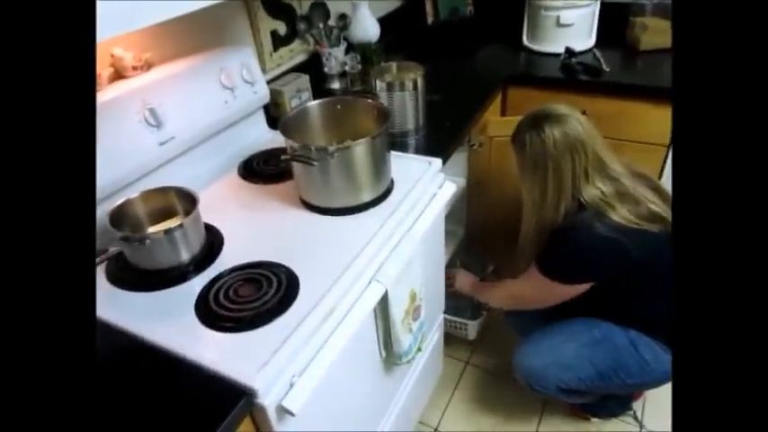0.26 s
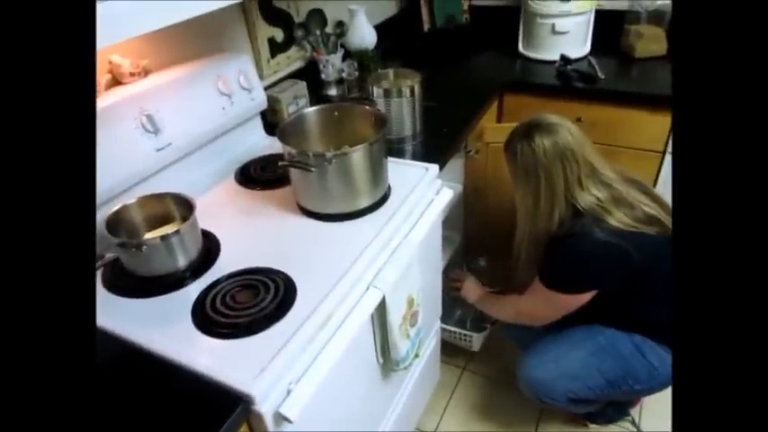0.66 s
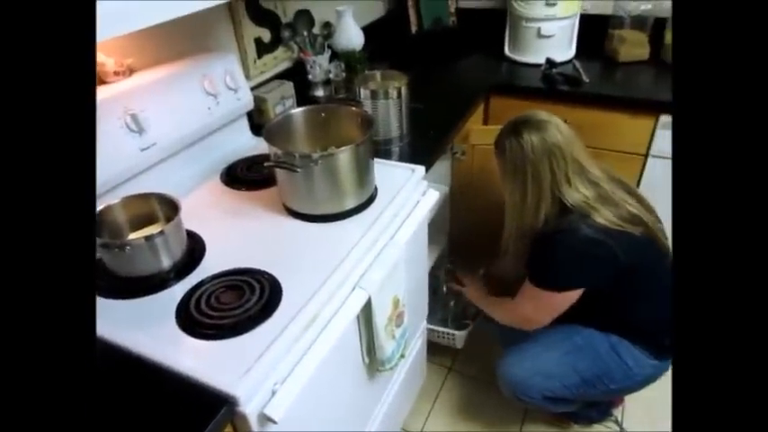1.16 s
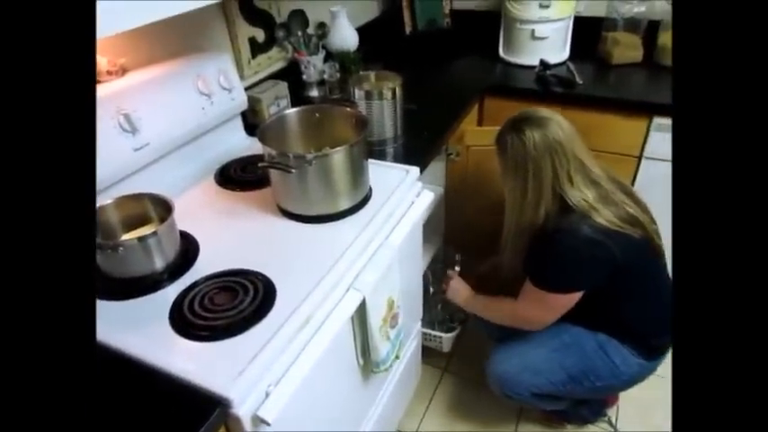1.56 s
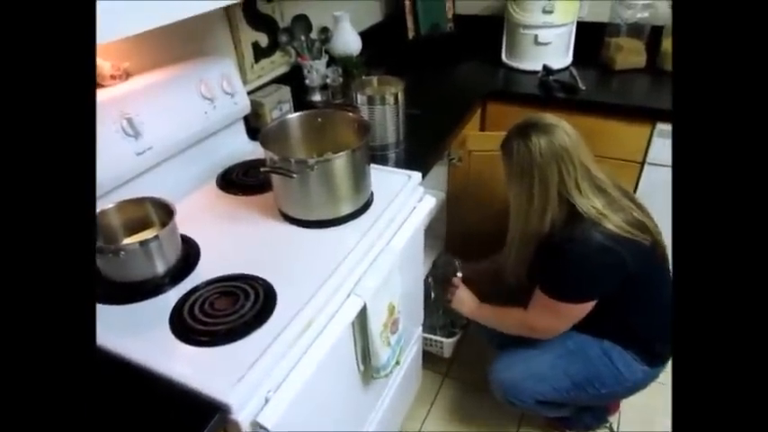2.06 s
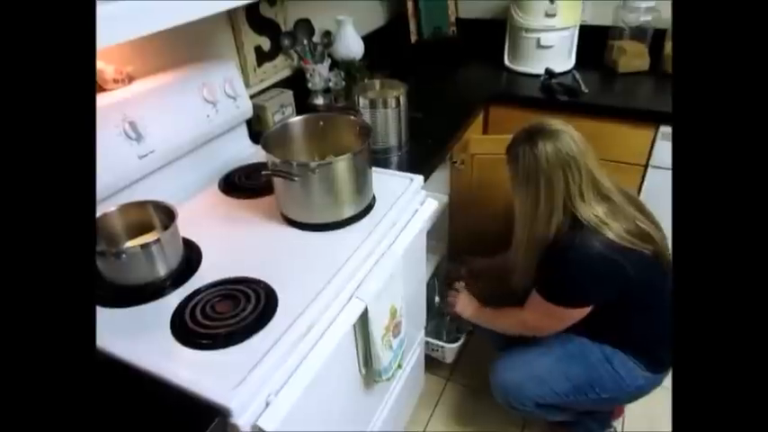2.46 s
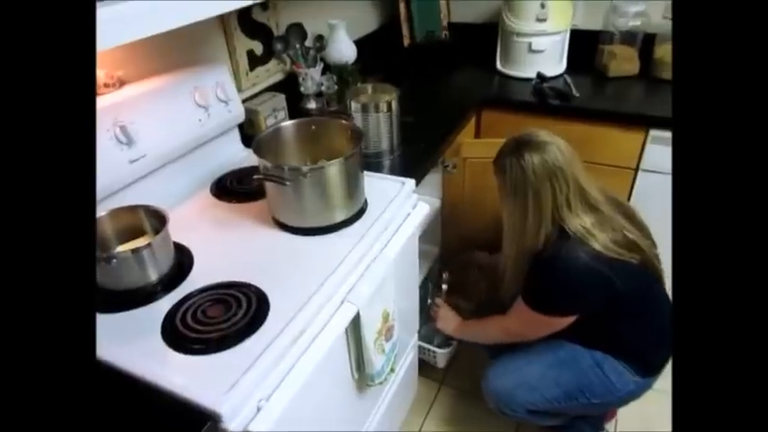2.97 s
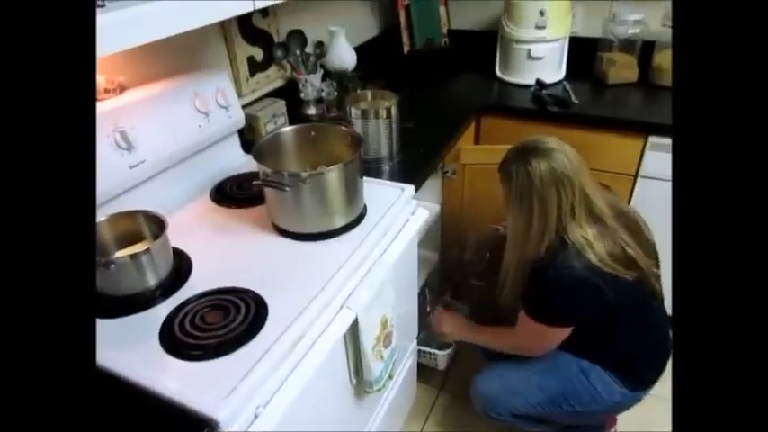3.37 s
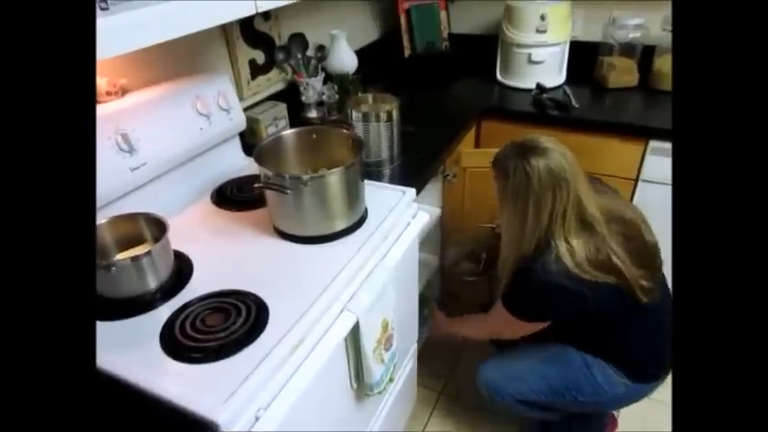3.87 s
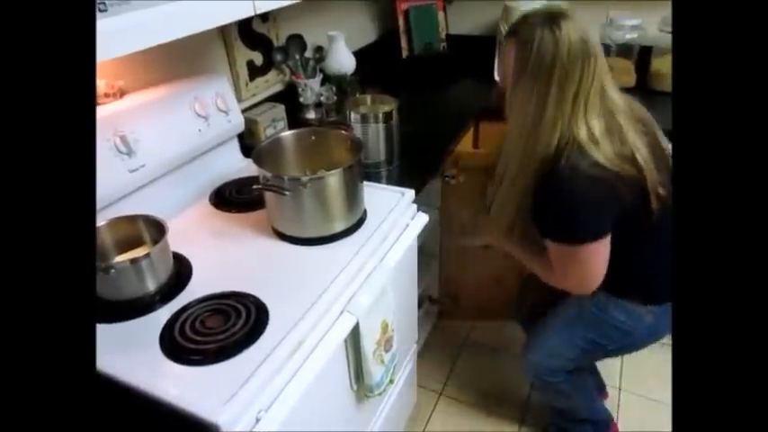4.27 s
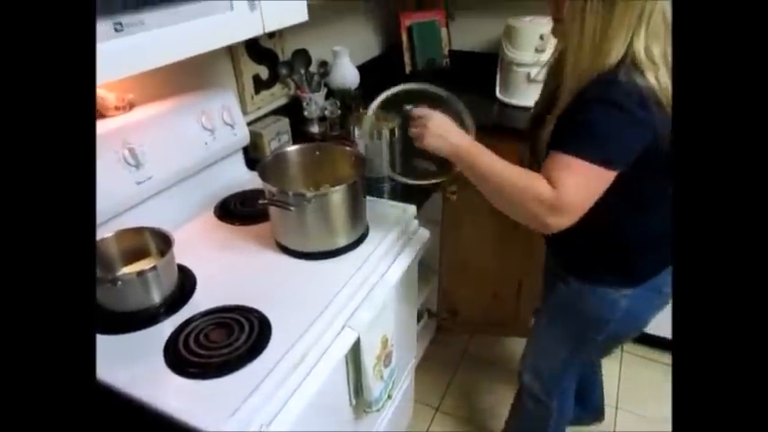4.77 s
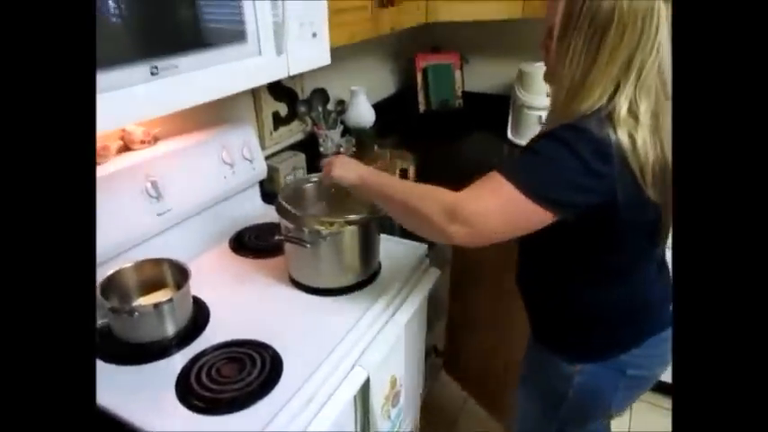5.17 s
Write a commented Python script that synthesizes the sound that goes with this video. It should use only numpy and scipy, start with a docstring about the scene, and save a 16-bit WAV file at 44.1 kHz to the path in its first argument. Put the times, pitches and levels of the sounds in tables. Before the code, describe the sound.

Metal pot lids clatter, clack and scrape in bursts as someone rummages through a kitchen cabinet, ending with a short soft rattle.

```python
"""Pot lids are shifted about in a wire basket inside a wooden kitchen cabinet, over a faint hiss.
Two rummages up to 2.2 s, two more from 2.3 to 4.3 s, then a short soft one at 4.85 s.
In each, rims clack and lids knock the shelf: noise bursts plus dying sine modes.
Lids scrape (random catches through the modes) and rocking lids hum (single wavering modes).
The tiled kitchen rings on after every blow: decaying sparse taps."""
import sys
import numpy as np
from scipy import signal
from scipy.fft import rfft, irfft
from scipy.io import wavfile
from scipy.ndimage import uniform_filter1d

SR = 44100
rng = np.random.default_rng(int(sys.argv[2]) if len(sys.argv) > 2 else 0)


def file_out(sig):
    """Save sig as 16-bit WAV at sys.argv[1]."""
    # one column per channel
    cols = np.atleast_2d(sig).T
    # limit, then scale
    lim = np.clip(cols, -1, 1)
    pcm = np.round(lim * 32767).astype(np.int16)
    wavfile.write(sys.argv[1], SR, pcm)


N = 238786

# mode pitches of shelf, basket and lid bowls: f/Hz
STACK_MODE_HZ = [102, 167, 228, 276, 323, 382, 450, 489, 582, 640, 700, 742, 797, 906, 970, 1040, 1190,
                 1330]
# strength of those modes, same order: level/dB, t60/s (t60 limited in rings)
STACK_MODES = [(-6.5, 0.31), (-5, 0.35), (4, 0.066), (-2, 0.22), (-3, 0.088), (-3.5, 0.17), (2.5, 0.13),
               (-2, .35), (-5.5, 0.43), (-15, 0.48), (4, 0.52), (4.5, 0.073), (1, 0.37), (5, 0.21),
               (-2, 0.37), (4, 0.11), (-12.5, 0.33), (-43, 0.15)]
# mode pitches of lid rims: f/Hz
RIM_MODE_HZ = [1450, 1572, 1768, 1992, 2170, 2385, 2520, 2750, 3050, 3230, 3420, 3680, 3950, 4300, 4700,
               5200, 5700, 6500]
# contact noise of rim on rim: f/Hz, relative density/dB per Hz
CRACK_SPECTRUM = [(410, -21), (700, -7), (1970, -7.5), (3370, -8), (4860, -11), (7490, -16), (13900, -30.5),
                  (15400, -37), (16000, -71)]
# contact noise of lid on shelf and basket: f/Hz, relative density/dB per Hz
THUMP_SPECTRUM = [(18, -60), (30, -40.5), (321, 2.5), (636, 0.5), (794, 2.5), (887, 0), (1070, -1.5),
                  (1600, -11.5), (2500, -16), (3250, -15), (5500, -120)]


def gain_of(db):
    """Amplitude factor of a level in dB."""
    return 10 ** (np.asarray(db) / 20)


def evened(x):
    """Scales each row to unit RMS."""
    return x / np.sqrt(np.mean(x ** 2, -1, keepdims=True) + 1e-20)


def read(points, hz):
    """Interpolates a (f/Hz, value) table over log frequency."""
    f, value = np.transpose(points)
    return np.interp(np.log(hz + 1), np.log(f + 1), value)


def add(mix, s, sound):
    """Adds a sound to the mix from s seconds on, cut at the end."""
    part = mix[round(s * SR):][:len(sound)]
    part += sound[:len(part)]


def coloured(x, spectrum):
    """Filters each row by a spectrum, zero phase."""
    hz = np.fft.rfftfreq(x.shape[-1], 1 / SR)
    return irfft(rfft(x) * gain_of(read(spectrum, hz)), x.shape[-1])


def hiss():
    """Faint noise of fixed mean spectrum; smoothed random patches drift its level over time and pitch."""
    # f/Hz, relative density/dB per Hz
    spectrum = [(15, -29), (25, -19.5), (50, -3.5), (92, -3.5), (123, 1.5), (145, -3), (591, -9),
                (1520, -7), (1790, -8), (2280, -10.5), (5000, -17.5), (7920, -23), (14400, -34.5),
                (16000, -58)]
    level_db, patch_rms_db = -47.5, 1.3
    frames, hz = N // 256 + 5, np.fft.rfftfreq(1024, 1 / SR)
    a, b, patches = rng.standard_normal((frames, 513, 3)).T
    patches = uniform_filter1d(uniform_filter1d(patches, 12, 0), 14, 1)
    patch_db = patch_rms_db * patches / patches.std()
    z = (a + 1j * b) * gain_of(read(spectrum, hz)[:, None] + patch_db)
    noise = signal.istft(z, nperseg=1024, noverlap=768)[1][:N]
    return gain_of(level_db) * evened(noise)


def kitchen(x):
    """Sparse taps of random sign, each band dying at its own speed; three tails take turns so blows differ."""
    # f/Hz, t60/s
    decay = [(100, 0.16), (260, 0.61), (700, 0.67), (1840, 0.72), (4850, 0.54), (12800, 0.33)]
    gap, first, turns_per_s = 20, 150, 3  # gap and first in samples
    taps = np.zeros((3, SR))
    at = np.arange(first, SR - gap, gap) + rng.integers(0, gap, (3, (SR - first - 1) // gap))
    np.put_along_axis(taps, at, rng.choice([-1., 1.], at.shape), 1)
    hz, t, z = signal.stft(taps, SR, nperseg=256)
    fade = gain_of(-60 * t / read(decay, hz)[:, None])
    tails = signal.istft(z * fade, SR, nperseg=256)[1]
    tails /= np.linalg.norm(tails[0])
    turn = 2 * np.pi * (turns_per_s * np.arange(N) / SR + np.arange(3)[:, None] / 3)
    shares = np.sqrt(2 / 3) * np.cos(turn)  # constant total power
    return signal.fftconvolve(x * shares, tails, axes=1)[:, :N].sum(0)


def rings(pitches, modes):
    """One exponentially dying sine for each mode, 1/3 s long."""
    db, t60 = np.transpose(modes)[:, :, None]
    t, t60 = np.arange(SR // 3) / SR, np.clip(t60, .03, .22)
    return gain_of(db - 60 * t / t60) * np.sin(2 * np.pi * np.c_[pitches] * t)


def rim_modes():
    """Touching rims damp fast: level falls with pitch, t60 is a fixed count of cycles (limited in rings)."""
    fall_db_per_octave, cycles_in_t60 = 4, 130
    return [(-fall_db_per_octave * np.log2(hz / RIM_MODE_HZ[0]), cycles_in_t60 / hz) for hz in RIM_MODE_HZ]


def scrape(offset_db, slope, pitches, modes, spectrum, per_s, spread_db, ring_db):
    """Tiny uneven catches, as strong as the drag, heard directly and through the modes."""
    # how hard lids drag over the stack, one list for each rummage: t/s, level/dB before offset and slope
    drag = [
        [(0.0, -48.5), (0.15, -44), (0.21, -28), (0.41, -30), (0.5, -27), (0.8, -42.5), (1.01, -23.5),
         (1.23, -42)],
        [(1.3, -40), (1.45, -29), (1.57, -26.5), (1.76, -34.5), (2.04, -45.5), (2.15, -57)],
        [(2.28, -57), (2.43, -28.5), (2.51, -17.5), (2.57, -33.5), (2.71, -27), (2.78, -38.5), (2.98, -44),
         (3.11, -26), (3.52, -47)],
        [(3.6, -41.5), (3.91, -25), (4.0, -24.5), (4.06, -43), (4.17, -39), (4.3, -71)],
        [(4.845, -46.5), (5.01, -56), (5.08, -65.5)],
    ]
    t, level = np.arange(N) / SR, np.zeros(N)
    for rows in drag:
        s, db = np.transpose(rows)
        level += gain_of(np.interp(t, s, offset_db + slope * db, -120, -120))
    chance, side, size = rng.random((3, N))
    catches = (chance < per_s / SR) * np.sign(side - .5)
    catches = catches * gain_of(-spread_db * np.log(size + 0.076))
    catches = level * evened(catches)
    ring = rings(pitches, modes).sum(0)
    ring /= np.linalg.norm(ring)
    grit = coloured(np.r_[np.zeros(1024), 1, np.zeros(1023)], spectrum)
    direct = signal.oaconvolve(catches, grit / np.linalg.norm(grit), "same")
    return direct + gain_of(ring_db) * signal.oaconvolve(catches, ring)[:N]


def rumble():
    """Drag heard through shelf, basket and bowls: sparser catches of nearly even size."""
    return scrape(0, 1, STACK_MODE_HZ, STACK_MODES, THUMP_SPECTRUM,
                  per_s=600, spread_db=-0.5, ring_db=-9.5)


def rasp():
    """Drag heard at the rims: denser, more uneven catches, almost no ring."""
    return scrape(-13, 0.83, RIM_MODE_HZ, rim_modes(), CRACK_SPECTRUM,
                  per_s=1500, spread_db=3, ring_db=-43.0)


def hums(rough, grain_ms):
    """Single modes that swell fast, waver in strength and phase while the lid rocks, and die away."""
    # t/s, level/dB, f/Hz (nearest mode sounds), t60/s
    table = [(.005, -37.5, 228, 0.099), (.125, -28, 906, 0.066), (0.216, -16.5, 323, 0.5),
             (0.214, -32, 102, 0.32), (.455, -21.5, 489, 0.71), (.68, -37, 228, 0.5),
             (0.848, -30.5, 102, 0.27), (0.942, -38, 1768, 0.97), (0.961, -24.5, 489, 0.64),
             (1.075, -14.5, 276, 0.13), (1.205, -42, 1992, 0.99), (1.43, -19, 489, 0.29),
             (1.674, -24.5, 102, 0.19), (1.675, -34.5, 700, 0.98), (1.76, -40.5, 167, 1),
             (2.41, -19, 582, 0.22), (2.53, -35, 1768, 1), (2.6, -40, 700, 0.27), (3.671, -20.5, 906, 0.15),
             (3.97, -23.5, 797, 0.38), (4.061, -32, 1040, 0.28)]
    swell_s, held_share = 0.0084, 0.11  # level holds for this share of t60 before it falls
    out, t, pitches = np.zeros(N), np.arange(SR) / SR, np.r_[STACK_MODE_HZ, RIM_MODE_HZ]
    size = round(grain_ms * SR / 1000)
    shakes = rng.standard_normal((len(table), 2, SR))
    shakes = evened(uniform_filter1d(uniform_filter1d(shakes, size), size))
    for (s, db, hz, t60), (a, b) in zip(table, shakes):
        mode_hz = pitches[np.argmin(abs(pitches - hz))]
        fall_db = 60 * np.maximum(t - held_share * t60, 0) / max(t60, .05)
        level = gain_of(db - fall_db) * (1 - np.exp(-t / swell_s))
        waver = 1 + rough * (a + 1j * b)
        add(out, s, level * (waver * np.exp(2j * np.pi * mode_hz * t)).imag)
    return out


def blows(table, rule, pitches, modes, spectrum, grit_db, spot_db, spot_octaves, chance_db, lift_hz, order):
    """Each blow: contact noise plus modes, strongest near the struck pitch; harder means shorter contact."""
    settle_db, settle_s, settle_grain_db = -17, 0.018, 6  # a struck lid rattles as it settles
    chatter = .5  # waver of the ring while lids touch
    stiff_power = 0.39  # higher-pitched spots are stiffer: shorter contact
    out, ring, mode_hz = np.zeros(N), rings(pitches, modes), np.array(pitches)
    t, bins = np.arange(4096) / SR, np.fft.rfftfreq(4096, 1 / SR) + 1
    ring_s = np.arange(ring.shape[1]) / SR
    luck = rng.standard_normal((len(table), 2 * len(modes) + len(t) + len(t) // 128))
    hard_ms, ms_per_db, hard_ring_db, ring_per_db = rule
    for (s, db, hz, lift_db), draw in zip(table, luck):
        near = lambda f: np.exp(-(np.log2(f / hz) / spot_octaves) ** 2)
        # lifts below lift_hz, or above it for a negative order
        lift = lambda f: lift_db / (1 + (f / lift_hz) ** order)
        sign, size, grit, rattle = np.split(draw, np.cumsum([len(modes), len(modes), len(t)]))
        contact_s = max(hard_ms - ms_per_db * db, 1) / 1000
        contact_s *= (np.median(mode_hz) / hz) ** stiff_power

        grit = rfft(evened(coloured(grit, spectrum)))
        burst = irfft(grit * gain_of(grit_db * near(bins) + lift(bins)))
        uneven_db = settle_grain_db * np.repeat(rattle, len(t) // len(rattle))
        settle = gain_of(settle_db + uneven_db) * np.exp(-t / settle_s)
        fall = np.exp(-(t / contact_s) ** 0.74) + settle * (1 - t / t[-1])
        burst *= fall * (1 - np.exp(-3 * t / contact_s))

        mode_db = spot_db * (near(mode_hz) - 1.5) + chance_db * size + lift(mode_hz)
        tone = (np.sign(sign) * gain_of(mode_db)) @ ring
        tone *= 1 - np.exp(-ring_s / (contact_s / 2))  # ring builds during contact
        steps = np.linspace(0, len(rattle), len(tone))
        waver = np.interp(steps, range(len(rattle)), rattle[::-1])
        tone *= 1 - chatter / 2 + chatter * waver

        add(out, s, gain_of(db) * burst / 2)
        add(out, s, gain_of(db + hard_ring_db - ring_per_db * db) * tone)
    return out


def knocks():
    """Lids knock shelf and basket: low thumps exciting the stack modes, with a boom lift below 195 Hz."""
    # t/s, level/dB, struck spot f/Hz, boom lift/dB
    table = [(0.125, -24, 806, -15), (0.21, -14.5, 805, -10), (0.216, -10.5, 390, 22),
             (0.239, -13.5, 325, 23), (0.448, -6.5, 850, -29), (0.842, -12, 312, -6), (0.867, -14, 346, 19),
             (0.904, -11.5, 500, 16), (0.969, -17.5, 500, -12), (1.08, -20.5, 280, 4),
             (1.415, -5.5, 605, 11), (1.449, -12.5, 484, 5), (1.672, -14.5, 730, 19), (1.699, -14, 377, 22),
             (2.367, -28, 810, -8), (2.407, -8, 597, 6), (2.459, -7, 596, -19), (2.499, -7, 510, 19),
             (2.524, -7, 620, 7), (2.599, -14, 655, 11), (2.929, -4.5, 332, 21), (2.945, -6.5, 1190, 10),
             (3.119, -9, 340, 20.5), (3.212, -2.5, 570, 3), (3.25, -10.5, 533, 15), (3.441, -14, 477, 8),
             (3.466, -7, 1040, 9.5), (3.67, -7.5, 944, -41), (3.799, -15.5, 413, 10), (3.829, -9, 428, -8),
             (3.869, -13, 784, -2), (3.912, -1.5, 302, 5), (3.953, -4, 434, -10), (4.009, -8.5, 844, -26),
             (4.068, -16, 1020, 14.5), (4.15, -24.5, 1010, -6), (4.859, -21.5, 316, 20),
             (4.889, -19, 1154, 10), (4.918, -22, 211, 22)]
    # contact at 0 dB/ms, more per dB softer/ms, ring at 0 dB/dB, more per dB softer/dB
    rule = (9.5, 0.07, -4, 0.1427)
    return blows(table, rule, STACK_MODE_HZ, STACK_MODES, THUMP_SPECTRUM, grit_db=8.0, spot_db=15,
                 spot_octaves=0.17, chance_db=2.0, lift_hz=195, order=5)


def clacks():
    """Rim strikes rim: short bright cracks exciting the rim modes, with a treble lift above 5460 Hz."""
    # t/s, level/dB, struck spot f/Hz, treble lift/dB
    table = [(0.044, -31, 3000, 9), (0.1246, -31, 1520, 12.5), (0.171, -24, 3000, -2),
             (0.2113, -15.5, 2780, -2.5), (0.405, -34, 3000, -1), (0.4505, -3, 2980, 2),
             (0.4714, -9, 1540, 7.5), (0.614, -12, 2610, -2.5), (0.66, -17.5, 2600, -21),
             (0.8256, -15.5, 2570, -7), (0.8966, -11.5, 1580, -9.5), (0.9348, -8.5, 1600, -11),
             (0.9558, -15, 1730, -2), (0.9984, -17.5, 1790, 5), (1.0504, -13, 2770, -2.5),
             (1.1192, -20, 2780, -10), (1.2031, -17, 2180, 1.5), (1.2199, -21, 1980, -7),
             (1.327, -20, 1940, -21), (1.3931, -2.5, 2270, -4), (1.4094, -4.5, 3450, -4),
             (1.4944, -10, 3970, 0.5), (1.5419, 0.5, 4300, -3.5), (1.6578, -4.5, 3840, -2.5),
             (2.3257, -25.5, 3020, 5), (2.4032, -5, 2670, 4), (2.4662, -3, 2930, 3),
             (2.4911, -0.5, 3320, -8), (2.527, -3, 1770, 5), (2.5565, -28, 2440, -10),
             (2.8864, -13.5, 3940, -1.5), (2.936, -9.5, 1940, -6.5), (2.969, -16, 2500, 7),
             (3.1107, -9, 3060, -3), (3.2071, -7.5, 2710, 6.5), (3.217, -2.5, 3000, -42),
             (3.434, -9, 2780, 1), (3.4537, -8, 2780, 6), (3.4744, -10, 3260, 3.5), (3.671, -18.5, 1530, 8),
             (3.8241, -15, 2420, 1), (3.9065, -7, 3140, 1), (3.9594, -23, 1500, -7),
             (3.9996, -16.5, 1570, 8.5), (4.8612, -28.5, 3270, 2), (4.8894, -21.5, 1600, -13),
             (4.93, -29.5, 1460, -20)]
    # contact at 0 dB/ms, more per dB softer/ms, ring at 0 dB/dB, more per dB softer/dB
    rule = (2.5, 0.06, -15, 0.39)
    return blows(table, rule, RIM_MODE_HZ, rim_modes(), CRACK_SPECTRUM, grit_db=5, spot_db=12,
                 spot_octaves=.14, chance_db=3, lift_hz=5460, order=-3)


def scene():
    """Hiss, scraping, hums and blows, with the kitchen tail of all but the hiss."""
    drag = rumble() + rasp()
    hum = hums(rough=.5, grain_ms=12)
    knock, clack = knocks(), clacks()
    to_kitchen = clack + gain_of(-3) * knock + gain_of(-7.0) * drag + gain_of(-9.5) * hum
    return (hiss() + kitchen(to_kitchen) + drag + hum + knock + clack)[None]


def record(dry):
    """Peaks clip hard at 0.95 of full scale; then a linear-phase low-pass."""
    edge = signal.firwin(255, 15300, window=("kaiser", 9), fs=SR)  # cutoff in Hz
    return signal.oaconvolve(np.clip(dry, -.95, .95), edge[None], "same")


dry = scene()
out = record(dry)
file_out(out)
```